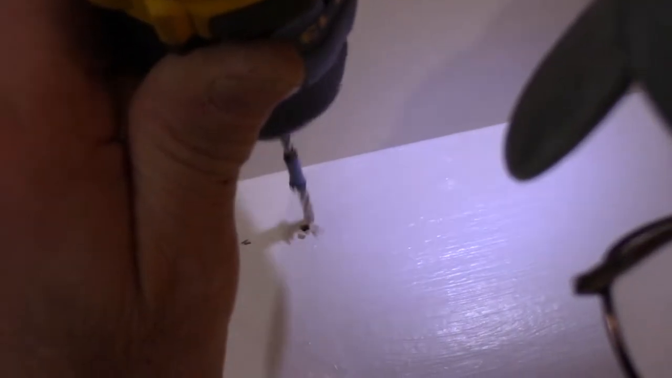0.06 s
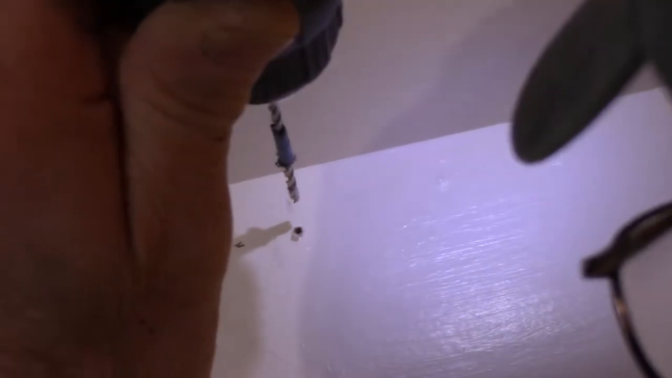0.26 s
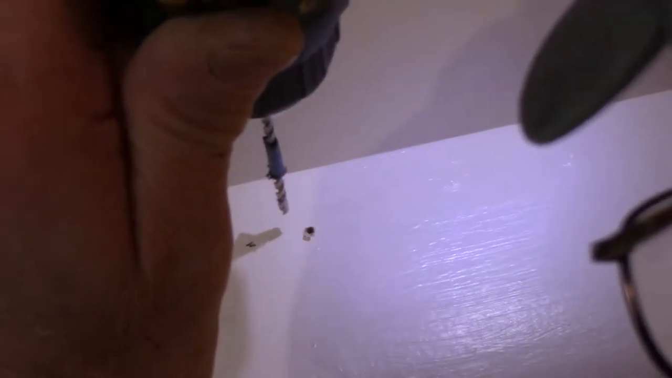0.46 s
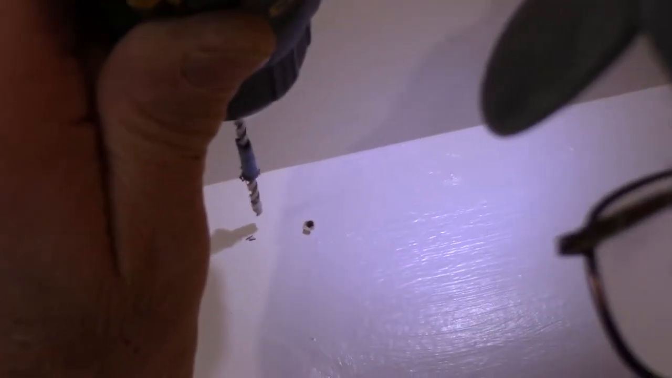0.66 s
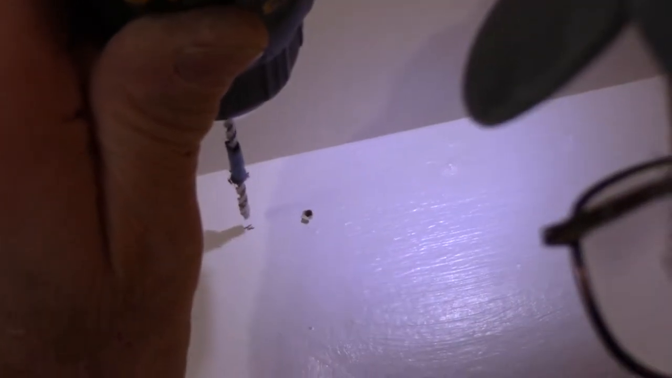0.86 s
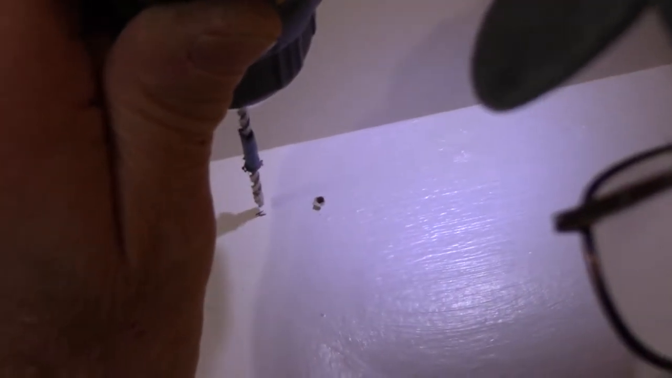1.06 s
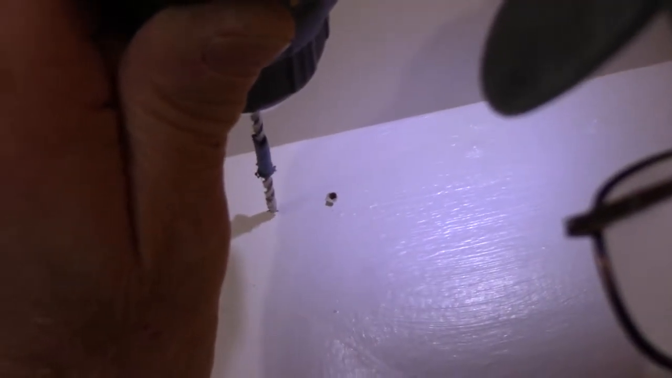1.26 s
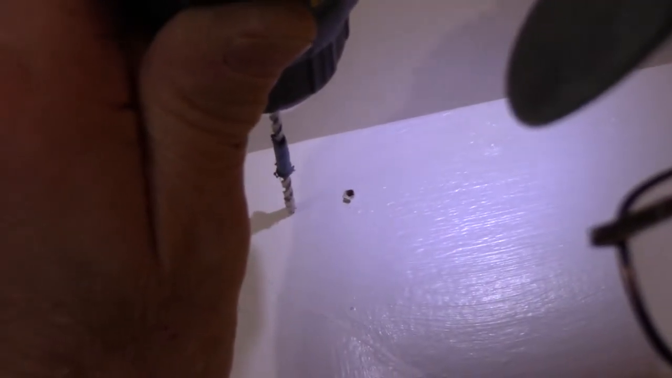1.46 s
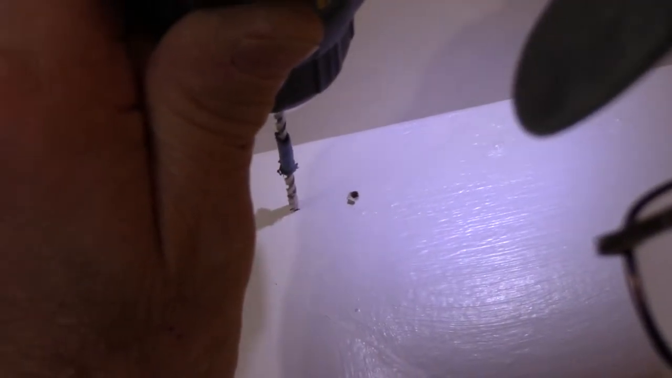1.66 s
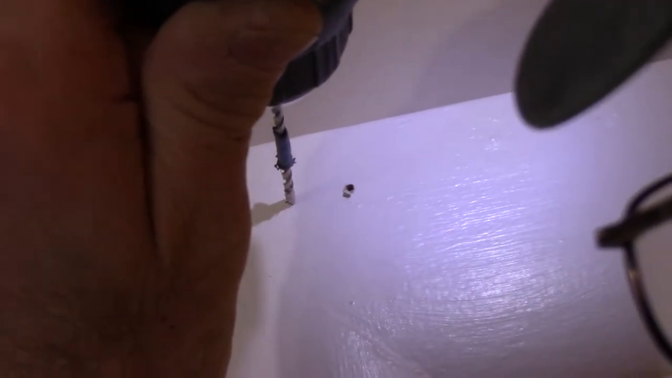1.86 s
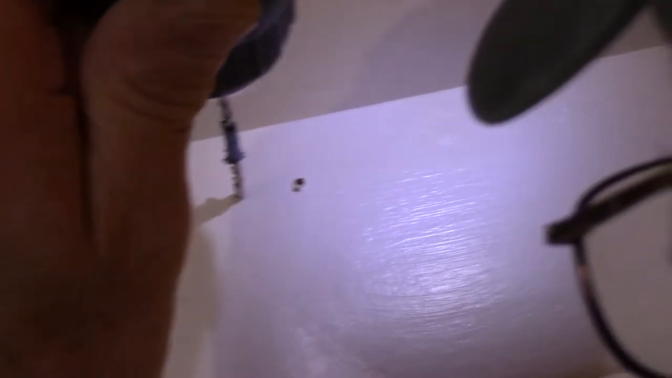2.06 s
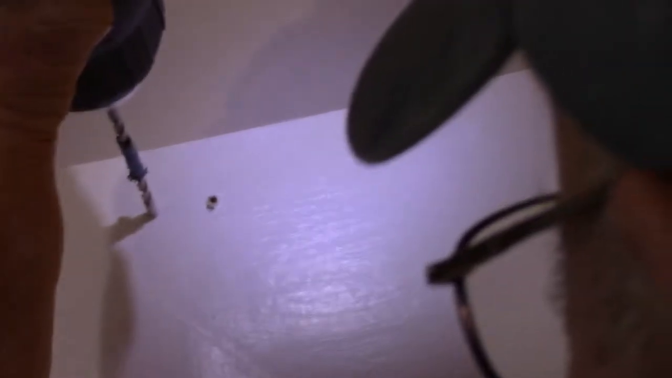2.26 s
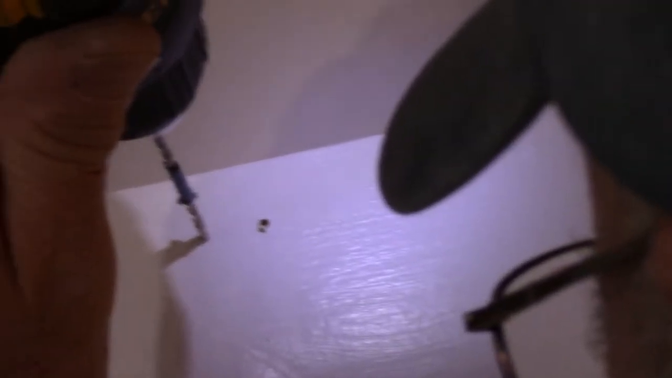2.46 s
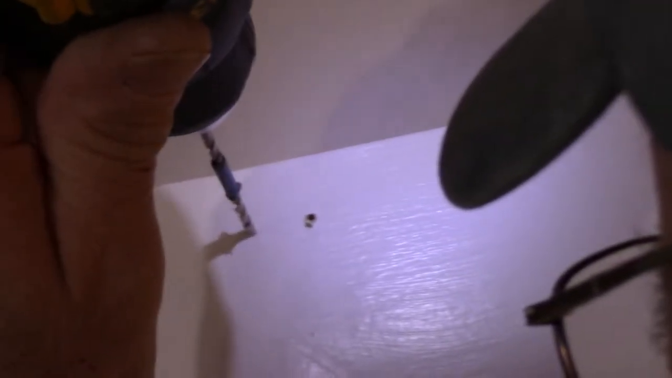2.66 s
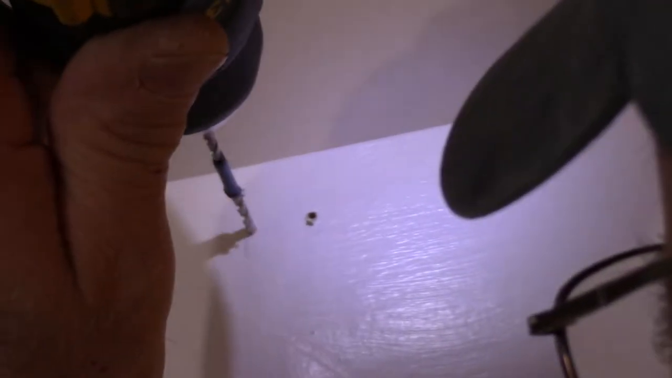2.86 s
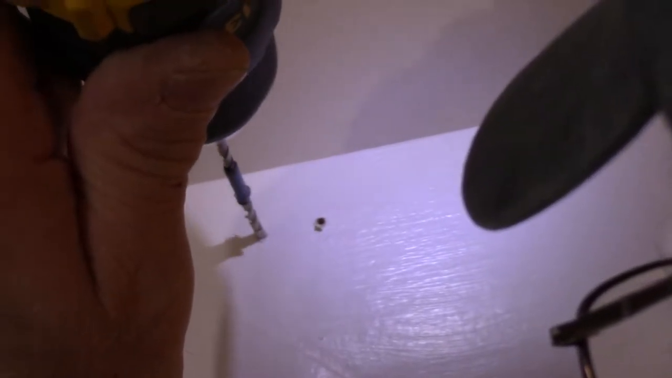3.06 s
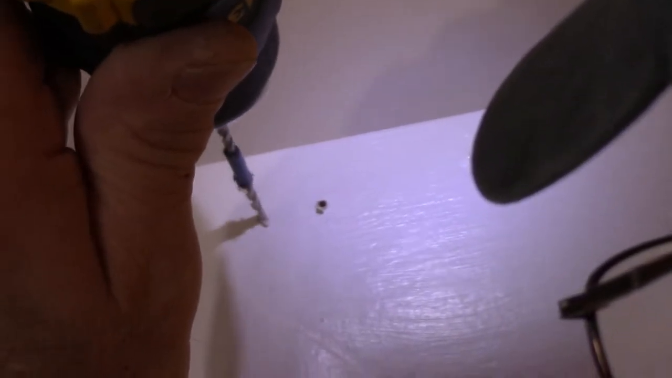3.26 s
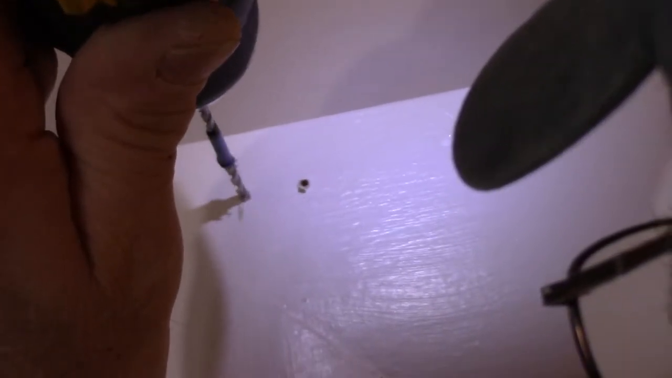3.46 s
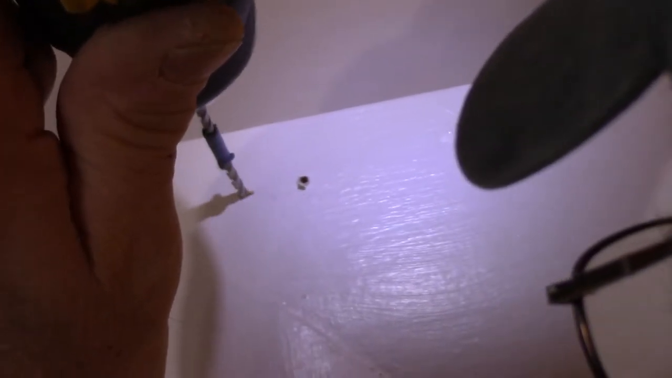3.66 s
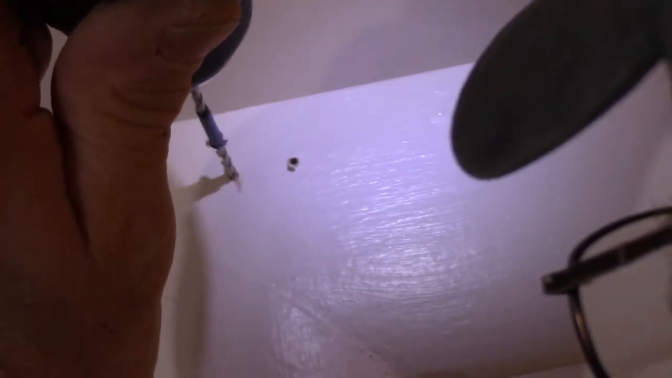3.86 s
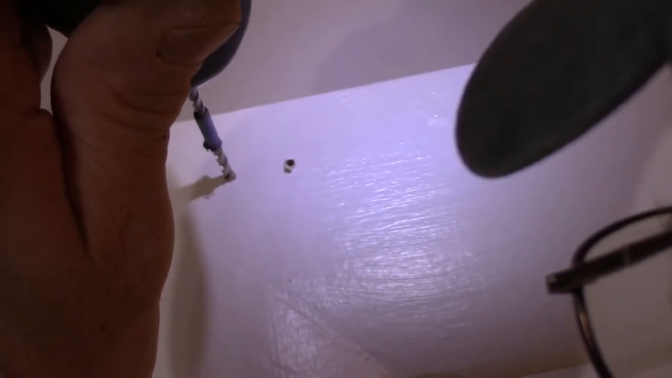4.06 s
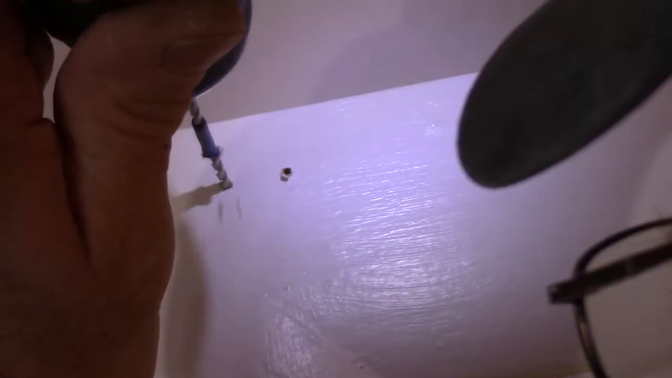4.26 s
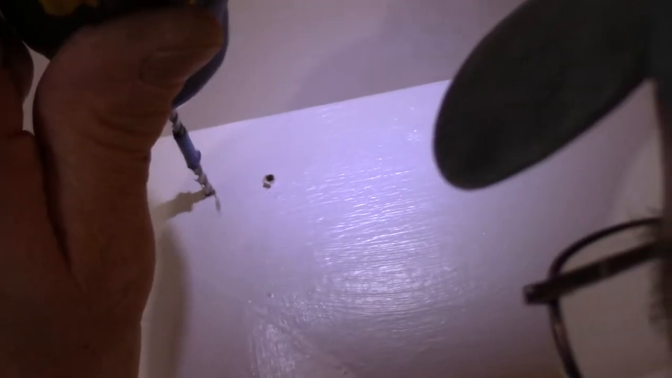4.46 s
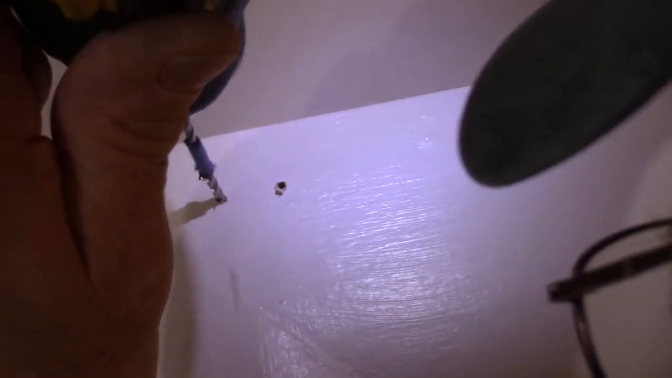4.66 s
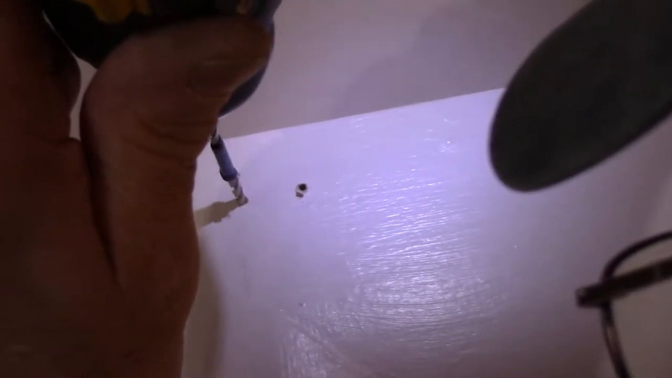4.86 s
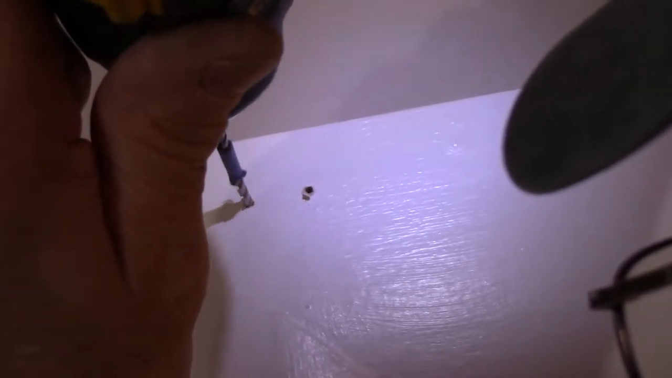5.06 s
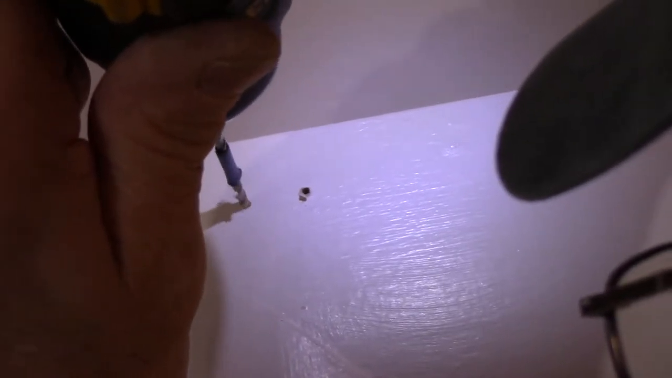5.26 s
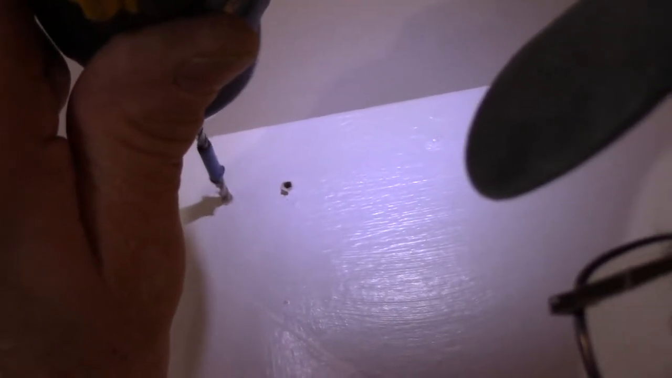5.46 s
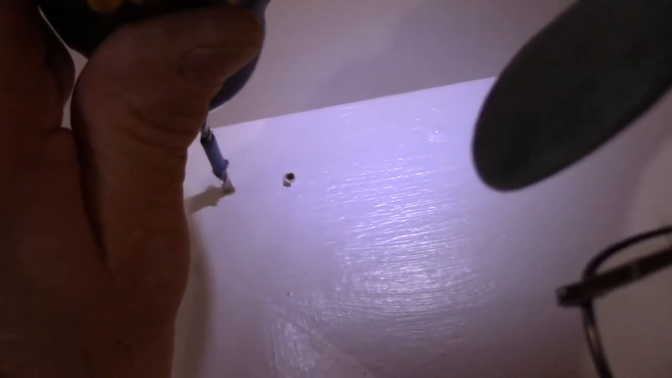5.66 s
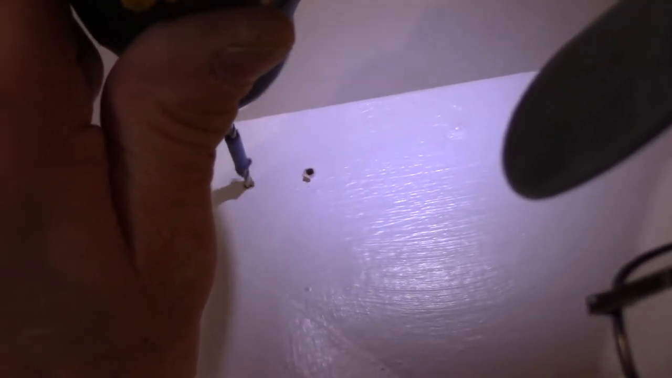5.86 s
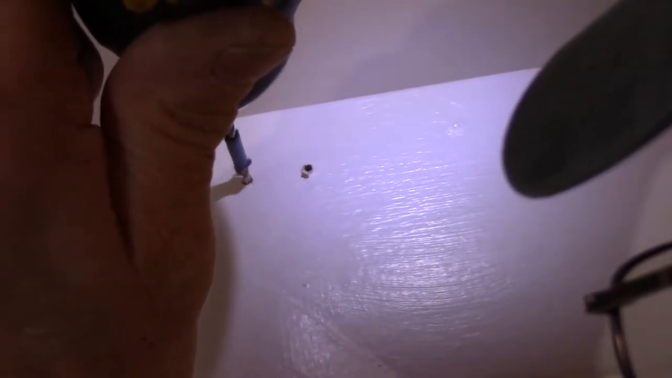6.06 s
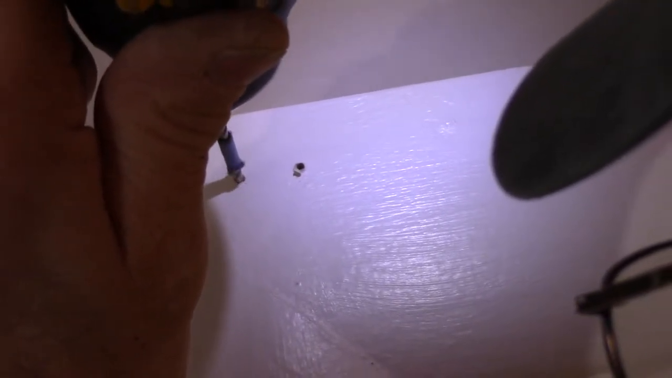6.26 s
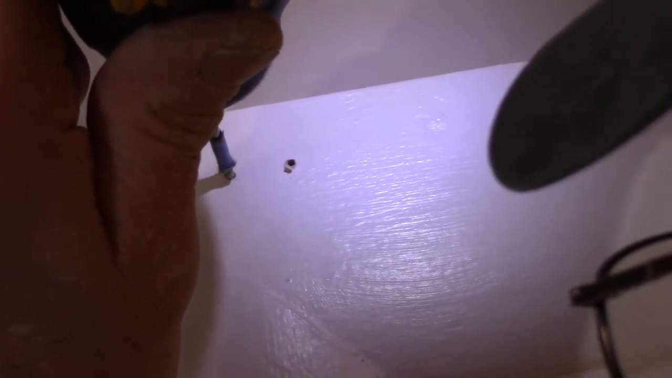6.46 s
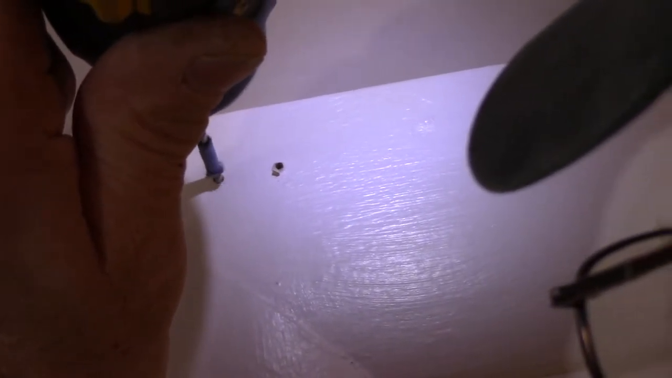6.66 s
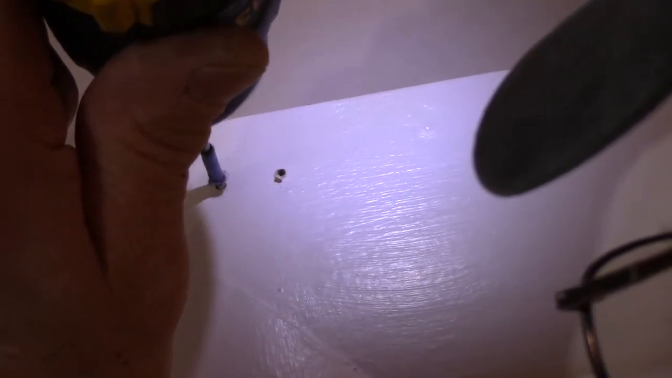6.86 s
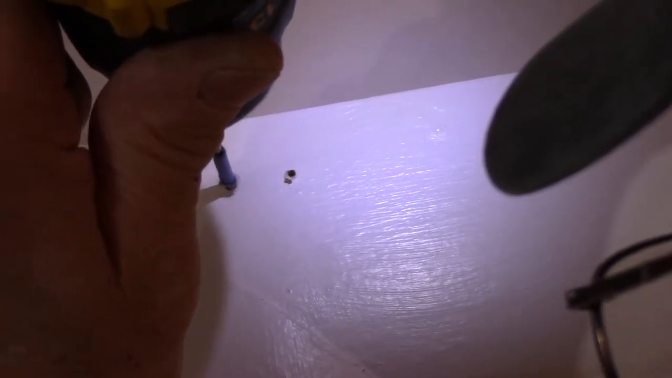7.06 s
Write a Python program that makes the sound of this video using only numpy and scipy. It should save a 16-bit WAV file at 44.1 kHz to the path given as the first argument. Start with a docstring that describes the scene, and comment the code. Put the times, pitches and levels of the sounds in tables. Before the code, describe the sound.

A cordless drill brakes sharply to a stop, then after a quiet pause whines up in rising steps as it bores wood in a small room.

```python
"""A cordless drill, close by in a small room, backs out of a pilot hole and is stopped by its brake.
After a pause the tip bumps down on wood and bores the next hole in four squeezes, each faster than the last.
Motor and gears whine as sines at multiples of the shaft speed; rattling teeth, the scraping bit and the
droning housing are random impacts through resonances; decaying noise and rings make the knocks.
Rattle and knocks also reach the microphone off the walls, over rumble, mains hum and hiss."""
import sys
import numpy as np
from scipy import signal
from scipy.fft import rfft, irfft, next_fast_len
from scipy.io import wavfile
from scipy.ndimage import uniform_filter1d, map_coordinates

SR = 44100
rng = np.random.default_rng(int(sys.argv[2]) if len(sys.argv) > 2 else 0)


def unload_wav(signal):
    """Save mono or channel-first audio to the path in sys.argv[1] as 16-bit WAV at rate SR, clipped to [-1, 1]."""
    wavfile.write(
        sys.argv[1],
        SR,
        np.round(np.clip(np.atleast_2d(signal).T, -1, 1) * 32767).astype(np.int16),
    )


N = 313551

# the wood's changing drag on the bit: (time [s], shaft speed gained or lost [Hz])
WOOD_DRAG = [(3.48, 0), (3.7, -1.9), (3.95, -2.9), (4.25, -1.5), (4.55, -3.2), (5.1, -4), (5.35, 0),
             (5.62, -1.7), (6.05, 1.1), (6.95, -1)]
# squeezes of the trigger: (time [s], shaft speed aimed at [Hz], lag [s], gear rattle before surge and drift [dB],
# bit scrape before surge and drift [dB], housing drone before surge [dB], drift of the cut [dB/s])
TRIGGER_SQUEEZES = [(2.424, 88.84, 0.058, -20.5, -21, -26, 9), (2.76, 175, 0.23, -16.5, -14.5, -22, -12),
                    (2.945, 202.4, .041, -18.5, -20, -23.5, -0.63),
                    (5.128, 287.5, .037, -19, -22.5, -21, -1.5)]
SETTLE_S = 0.048  # time constant with which rattle and scrape reach their new level
SURGE_DB, SURGE_S = 2.5, 0.061  # every squeeze jolts the gears: size and time constant
GEAR_DRIFT = 0.12  # share of the cut's drift that the gear rattle follows
DUCK_DB, DUCK_HZ_PER_S = -7, 2000  # the steady whine ducks this much at this acceleration of the shaft


def boring():
    """Each squeeze speeds the shaft up and jolts the gears; while held, the cut drifts louder or softer."""
    starts, speeds, lags, *work = np.transpose(TRIGGER_SQUEEZES)
    driven_hz = stepped(speeds, lags, rest=0)
    hz, angle = shaft(np.abs(driven_hz + curves(WOOD_DRAG)[0]))
    gear_db, bit_db, drone_db, drift = [stepped(column, SETTLE_S, rest=column[0]) for column in work]

    held_s = since(stepped(starts, SETTLE_S, rest=starts[0]))
    drift_db = drift * held_s
    surge_db = SURGE_DB * sum((since(s) > 0) * np.exp(-since(s) / SURGE_S) for s in starts)
    grinding = grind(hz, angle, gear_db + GEAR_DRIFT * drift_db, bit_db + drift_db, drone_db)
    under_way = np.minimum(hz / speeds[0], 1)  # silent at rest, full from the first speed up

    acceleration = uniform_filter1d(np.gradient(driven_hz) * SR, size=SR // 100)
    ducking = amp(DUCK_DB * acceleration / DUCK_HZ_PER_S)
    singing = ducking * motor(hz, angle, held_s) + squeals(angle)
    return singing, under_way * amp(surge_db) * grinding


def stepped(goals, lags, rest):
    """From rest, a value closes in exponentially on a new goal at each squeeze of the trigger."""
    value = rest
    for (start, *_), goal, lag in zip(TRIGGER_SQUEEZES, goals, np.broadcast_to(lags, len(goals))):
        value = goal + (value - goal) * np.exp(-since(start) / lag)
    return value


def shaft(speed_hz, hunt=0.0011):
    """Speed and angle of the motor shaft, which hunts a little under its load."""
    hz = speed_hz * (1 + hunt * wobble(28))
    return hz, 2 * np.pi * np.cumsum(hz) / SR


# whine while boring, before shell and speed:
# (shaft order [multiple of shaft speed], level [dB], drift after each squeeze [dB/s])
BORING_ORDERS = [(1, -18.5, -.3), (2, -26, 0), (3, -22.5, -1.8), (4, -15.5, -1.4), (5, -21.3, -3.2),
                 (6, -32, 0), (7, -27, 0), (8, -22, -1), (11, -26, -2), (12, -12, -1), (13, -26, -2),
                 (14, -22.5, -.8), (16, -20.5, .4), (20, -24.5, -.7), (21, -32.5, 0), (22, -32, 4),
                 (44, -26, -2)]
WHINE_FULL_HZ, WHINE_GROWTH = 212, .7  # the whine grows as this power of the speed, up to this speed
CATCH_HZ, CATCH_WIDTH_HZ = 122, 36  # the tip catches in the surface around this shaft speed
JUDDER_RAD = .06  # while it catches, the shaft judders
FLICKER_DB, SINK_DB = 4.5, -3  # and each tone flickers and sinks
BEARING_ORDER = 25.8  # multiple of the shaft speed


def motor(hz, angle, held_s, bearing_db=-18):
    """Shaft orders and a bearing tone flare at the shell's resonances; all judder while the tip catches."""
    catching = np.exp(-((hz - CATCH_HZ) / CATCH_WIDTH_HZ) ** 2)
    angle = angle + JUDDER_RAD * catching * wobble(150)
    tones = 0
    for order, db, drift in BORING_ORDERS:
        catch_db = catching * (SINK_DB + FLICKER_DB * wobble(45))
        tones = tones + amp(db + drift * held_s + catch_db) * whine(order, hz, angle)
    bearing_level = amp(bearing_db + along(SHELL_RADIATION, BEARING_ORDER * hz))
    # the balls roll out of step with the shaft, so their phase is looser
    bearing = bearing_level * tone(BEARING_ORDER, angle, slop=0.091)
    return np.minimum(hz / WHINE_FULL_HZ, 1) ** WHINE_GROWTH * (tones + bearing)


# how well the shell radiates a tone that sweeps through it: (frequency [Hz], level [dB])
SHELL_RADIATION = [(100, -11), (200, -13.5), (245, -22), (290, -9.5), (350, -5), (430, -24), (590, -6),
                   (660, -7), (705, -14), (815, 0), (870, -2), (1050, 2), (1150, 0), (1420, -8), (1620, -1),
                   (1800, -4), (2020, -11), (2300, -25), (3200, -11), (3450, -21), (3800, -4), (4200, 5),
                   (4400, 1), (4610, 1), (4800, -16), (7000, -45)]


def whine(order, hz, angle):
    """A whole shaft order heard through the shell, flaring as it crosses a resonance."""
    order = np.round(order)
    return amp(along(SHELL_RADIATION, order * hz)) * tone(order, angle)


def tone(order, angle, flutter_db=1, slop=.024):
    """One shaft order, a sine near rms 1; play in the gears shakes its level and phase."""
    shake = slop * np.sqrt(order) * (wobble(45) + wobble(170))
    # neighbours in quadrature: uneven turning bends the tone rather than pulsing it
    lead = np.pi / 2 * order ** 2
    return np.sqrt(2) * amp(flutter_db * wobble(40)) * np.sin(order * angle + lead + shake)


# brief squeals as load or speed changes:
# (time [s], half length [s], shaft order [multiple of shaft speed], peak level [dB])
SQUEAL_EVENTS = [(2.485, .03, 12, -26), (2.62, .08, 16, -27), (2.82, .025, 16, -23), (2.89, .028, 12, -20),
                 (2.918, .012, 32, -20), (2.985, .035, 4, -22), (3.02, .025, 22, -22),
                 (5.162, .022, 16, -10.5)]


def squeals(angle):
    """Each squeal swells and fades on its multiple of the shaft speed."""
    t = np.arange(N) / SR
    total = 0
    for start, half, order, db in SQUEAL_EVENTS:
        swell = np.exp(-((t - start) / half) ** 2)
        total = total + amp(db) * swell * tone(order, angle)
    return total


# relative spectra of gear rattle, bit scrape and housing drone: (frequency [Hz], density [dB per Hz])
GEAR_SPECTRUM = [(1500, -37), (3000, -14.5), (3800, -1), (4500, -4), (5600, -0.5), (6150, -7.5),
                 (6600, -7.5), (8000, -14.5), (9500, -14), (9900, -18.5), (11200, -25.5), (12300, -43),
                 (14700, -37), (16000, -40)]
BIT_SPECTRUM = [(900, -24), (1900, -0.5), (2300, -4), (2900, 1.5), (3400, -3), (4500, -8), (8000, -14),
                (12500, -33), (14700, -33), (16000, -27)]
DRONE_SPECTRUM = [(30, -14.5), (100, -18), (160, -16), (300, -16), (490, -15.5), (600, -7), (800, -3.5),
                  (1050, 1), (1400, -5), (1800, -11.5), (2300, -10), (4000, -40)]


def grind(hz, angle, gear_db, bit_db, drone_db, teeth=22, chips=18, throb=0.027, chatter_hz=150, slowest_hz=35):
    """Gear teeth rattle and the bit tears fibres, more often as the shaft speeds up; the housing drones."""
    hz = np.maximum(hz, slowest_hz)
    beat = 1 + throb * (np.cos(angle) + np.cos(2 * angle)) / 2  # once and twice a turn
    tooth_hits = impacts(teeth * hz, scatter_db=-1.5) + .5 * rng.standard_normal(N)
    fibre_tears = impacts(chips * hz, scatter_db=2.5) + .5 * rng.standard_normal(N)
    gears = housed(beat * tooth_hits, GEAR_SPECTRUM)
    bit = housed(beat * fibre_tears, BIT_SPECTRUM)
    drone = housed(impacts(30 * hz, scatter_db=3.5), DRONE_SPECTRUM)
    chatter = amp(np.minimum(chatter_hz / hz, 2) * wobble(70))  # a slow shaft runs less evenly
    return chatter * (amp(gear_db) * gears + amp(bit_db) * bit + amp(drone_db) * drone)


def impacts(rate, scatter_db):
    """Random tiny contacts of uneven size and either sign, rate a second, at constant power."""
    struck = rng.random(N) < rate / SR
    size = rng.choice([-1, 1], N) * amp(scatter_db * np.clip(rng.standard_normal(N), -2, 2))
    return unit(struck * size / np.sqrt(rate))


# resonances of housing and board, one lopsided near 6 kHz:
# (frequency [Hz], width [Hz], level added to the spectrum [dB])
HOUSING_MODES = [(211.3, 12.7, 16), (350, 14, 11.5), (1686, 110, 9), (4890, 75, 5), (5280, 190, 4),
                 (6090, 180, 8.5), (6000, 180, -3.5), (9250, 260, 6)]


def housed(x, spectrum):
    """x at rms 1 after a causal, minimum-phase filter: a broad spectrum plus the housing's resonances."""
    size = 4096
    hz = np.fft.rfftfreq(size, 1 / SR)
    modes_db = sum(gain / (1 + (2 * (hz - centre) / width) ** 2) for centre, width, gain in HOUSING_MODES)
    cepstrum = irfft(np.log(amp(along(spectrum, hz) + modes_db)))
    # folding the cepstrum forward puts the whole response after the impact
    cepstrum[1:size // 2] *= 2
    cepstrum[size // 2 + 1:] = 0
    response = irfft(np.exp(rfft(cepstrum)))
    return unit(signal.fftconvolve(x, response)[:N])


# whine while backing out, before shell and braking: (shaft order [multiple of shaft speed], level [dB])
BACKING_ORDERS = [(2, -23), (3, -29), (4, -25.5), (5, -28), (6, -18), (14, -26), (16, -32.5)]
BACK_HZ = 267.5  # shaft speed until the brake grips
BRAKE_S, BRAKE_LAG_S = .152, 0.037  # the brake grips, and its time constant
BACK_GEAR_DB, BACK_BIT_DB, BACK_DRONE_DB = -19, -19, -25.5  # before braking


def backing_out(whine_fall=4, rattle_fall=1.06):
    """The drill spins freely until the brake stops it; whine and rattle die as powers of the falling speed."""
    spin = np.exp(-since(BRAKE_S) / BRAKE_LAG_S)
    hz, angle = shaft(BACK_HZ * spin)
    tones = sum(amp(db) * whine(order, hz, angle) for order, db in BACKING_ORDERS)
    grinding = grind(hz, angle, BACK_GEAR_DB, BACK_BIT_DB, BACK_DRONE_DB)
    return spin ** whine_fall * tones + spin ** rattle_fall * grinding


# backlash knocks as the gears brake or take up drive: (time [s], clack level [dB], thud level [dB])
BACKLASH_KNOCKS = [(.149, -8, -7), (.156, -28, -10.5), (.174, -29, -23), (2.157, -40, -37),
                   (2.423, -8, -14.5), (2.442, -17, -22), (2.507, -12, -19), (2.546, -8.5, -17),
                   (2.772, -5.5, -18), (2.916, -10, -24), (2.958, -22, -17)]
# relative spectrum of the clack: (frequency [Hz], density [dB per Hz])
CLACK_SPECTRUM = [(300, -28), (700, -13), (1700, -10), (2400, 5.5), (3900, 13), (6000, -11), (9000, -6),
                  (12000, -25), (16000, -38)]
# the gear case rings with every knock: (frequency [Hz], level relative to the clack [dB], t60 [s])
CASE_RINGS = [(1723, -12.5, 0.18), (4240, -6.5, 0.057)]
# the chuck rings after braking: (frequency [Hz], level [dB], t60 [s])
CHUCK_RINGS = [(2720, -22, 0.19), (2740, -25, .18), (1440, -30, 0.36)]
CHUCK_S = .168  # the chuck starts to ring


def knocks():
    """Slack in the gear train closes with a clack and a thud that ring the gear case; the chuck rings once."""
    clack_level = sum(amp(db) * decay(s, t60=0.047) for s, db, _ in BACKLASH_KNOCKS)
    clack = clack_level * housed(rng.standard_normal(N), CLACK_SPECTRUM)
    thud_level = sum(amp(db) * decay(s, t60=0.051) for s, _, db in BACKLASH_KNOCKS)
    thud = thud_level * housed(rng.standard_normal(N), DRONE_SPECTRUM)
    case = 0
    for hz, ring_db, t60 in CASE_RINGS:
        case = case + ring(hz) * sum(amp(db + ring_db) * decay(s, t60) for s, db, _ in BACKLASH_KNOCKS)
    chuck = sum(amp(db) * decay(CHUCK_S, t60) * ring(hz) for hz, db, t60 in CHUCK_RINGS)
    return clack + thud + case + chuck


def ring(hz):
    """A ringing mode as a sine; loose parts blur its phase."""
    return np.sin(2 * np.pi * hz * np.arange(N) / SR + wobble(150))


def decay(start, t60, attack=.0022):
    """A quick rise and an exponential fall."""
    t = since(start)
    return (1 - np.exp(-t / attack)) * amp(-60 * t / t60)


TOUCH_S = 1.416  # the tip touches the board


def placing(bump_db=-36, board_hz=280):
    """The tip is set down on the board with a soft, dull bump: noise around one broad resonance."""
    board = unit(filtered(rng.standard_normal(N), lambda hz: 1 / (1 + ((hz - board_hz) / 60) ** 2)))
    return amp(bump_db) * decay(TOUCH_S, t60=0.34, attack=0.0035) * board


# reverberation of the small room: (frequency [Hz], t60 [s])
ROOM_T60 = [(150, 0.37), (1000, 0.22), (3000, 0.28), (6000, 0.16), (12000, 0.1)]


def room(x):
    """The walls answer 5 ms late with a tail of noise, the highest treble dying first."""
    hz, t, z = signal.stft(rng.standard_normal(SR // 2), SR, nperseg=256)
    fading = amp(-60 * t / along(ROOM_T60, hz)[:, None])
    tail = signal.istft(z * fading, SR, nperseg=256)[1]
    return signal.fftconvolve(x, np.pad(tail / np.linalg.norm(tail), (SR // 200, 0)))[:N]


# relative spectra of rumble and hiss: (frequency [Hz], density [dB per Hz])
RUMBLE_SPECTRUM = [(15, -6.5), (30, 0), (55, 0.5), (70, -10.5), (100, -4.5), (160, -21), (230, -15.5),
                   (350, -29.5), (700, -35), (1500, -60)]
HISS_SPECTRUM = [(100, 10), (500, 7.5), (1000, 4.5), (2000, 2), (4000, -0.5), (8500, -2), (15500, -5)]
# course of the low rumble, before overall level and wobble: (time [s], level [dB])
RUMBLE_COURSE = [(0.0, -29), (0.1, -27), (0.71, -35.5), (2.28, -32.5), (2.87, -24.5), (2.99, -30),
                 (7.11, -40.5)]
# mains hum and a faint high whistle: (frequency [Hz], rms level [dB])
HUM_TONES = [(59.8, -47), (119.6, -45.5), (7882, -67)]


def background(hiss_db=-45.0, rumble_db=-1):
    """Behind the drill: lumpy low rumble and hiss as shaped noise, mains hum and whistle as unsteady sines."""
    lumps_db = 3.2 * wobble(14) + 1.1 * wobble(4.07)
    rumble_level = amp(curves(RUMBLE_COURSE)[0] + rumble_db + lumps_db)
    rumble = rumble_level * shaped_noise(RUMBLE_SPECTRUM)
    hum = 0
    for hz, db in HUM_TONES:
        phase = 2 * np.pi * hz * np.arange(N) / SR + 0.59 * wobble(4.37)
        hum = hum + amp(db) * np.sqrt(2) * np.sin(phase)
    return rumble + hum + amp(hiss_db) * shaped_noise(HISS_SPECTRUM)


def shaped_noise(spectrum):
    """Noise of rms 1 with the given spectrum."""
    return unit(filtered(rng.standard_normal(N), lambda hz: amp(along(spectrum, hz))))


def amp(db):
    """Decibels to gain."""
    return 10 ** (np.asarray(db) / 20)


def unit(x):
    """Scale to rms 1."""
    return x / np.sqrt(np.mean(x ** 2) + 1e-20)


def along(points, hz):
    """(frequency [Hz], value) points read on a log axis."""
    f, v = np.transpose(points)
    return np.interp(np.log(hz + 1), np.log(f + 1), v)


def curves(rows):
    """One value per sample for each column after the time."""
    s, *cols = np.transpose(rows)
    return [np.interp(np.arange(N) / SR, s, c) for c in cols]


def since(start):
    """Seconds gone by since start, zero before it."""
    return np.maximum(np.arange(N) / SR - start, 0)


def wobble(rate):
    """A smooth random curve, rate knots a second."""
    knots = rng.standard_normal(int(N * rate / SR) + 4)
    return map_coordinates(knots, [np.arange(N) * rate / SR])


def filtered(x, response):
    """x times a response of frequency, padded by half a second."""
    m = next_fast_len(N + SR // 2)
    return irfft(rfft(x, m) * response(np.fft.rfftfreq(m, 1 / SR)), m)[:N]


def scene(room_db=-11):
    """Close to the drill: the boring whine arrives straight from the motor; all else of it also fills the room."""
    singing, grinding = boring()
    rattle = grinding + backing_out() + knocks() + placing()
    return (singing + rattle + amp(room_db) * room(rattle) + background())[None]


def record(dry, top_hz=15750):
    """At the microphone, peaks are rounded off near full scale and nothing is kept above the band limit."""
    rounded = dry[0] / (1 + np.abs(dry[0]) ** 8) ** (1 / 8)
    return filtered(rounded, lambda hz: hz < top_hz)[None]


dry = scene()
out = record(dry)
unload_wav(out)
```